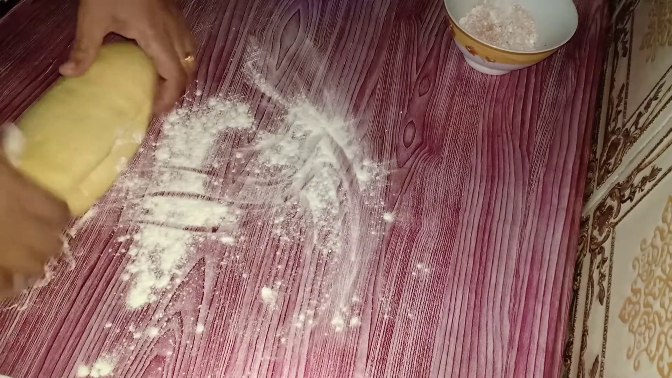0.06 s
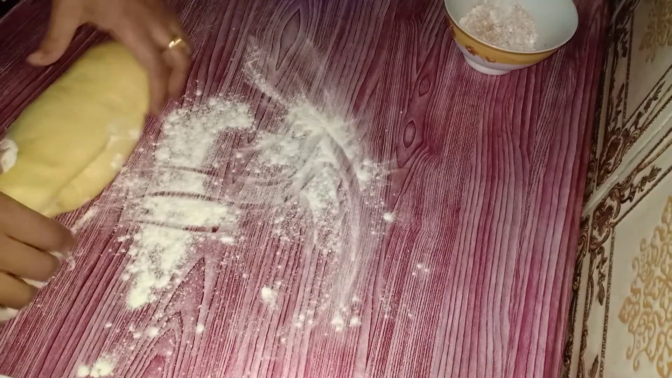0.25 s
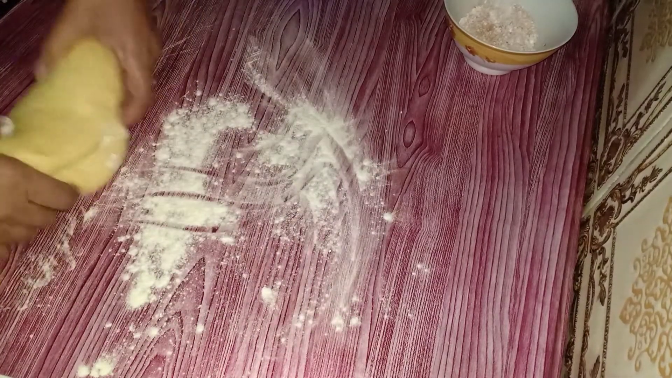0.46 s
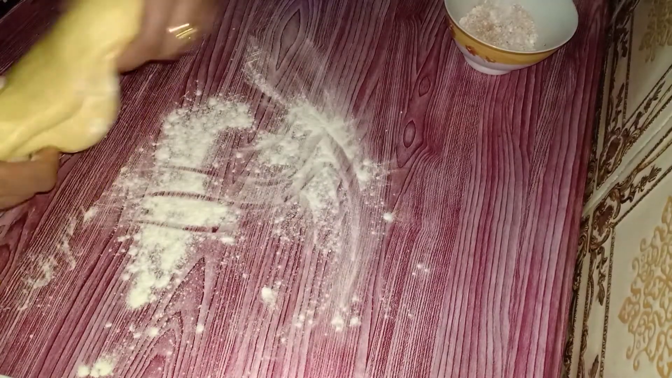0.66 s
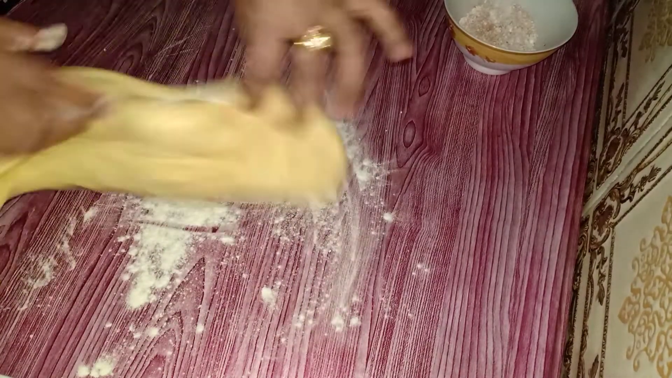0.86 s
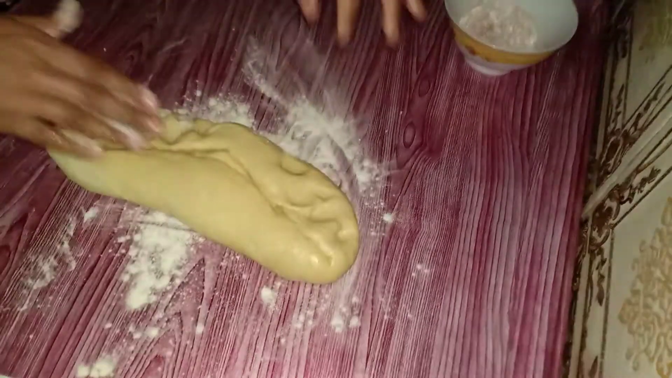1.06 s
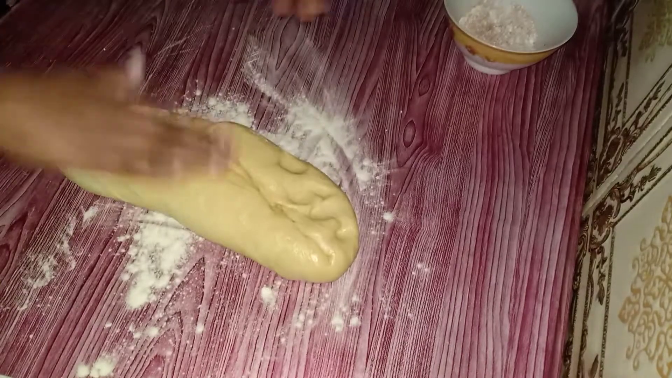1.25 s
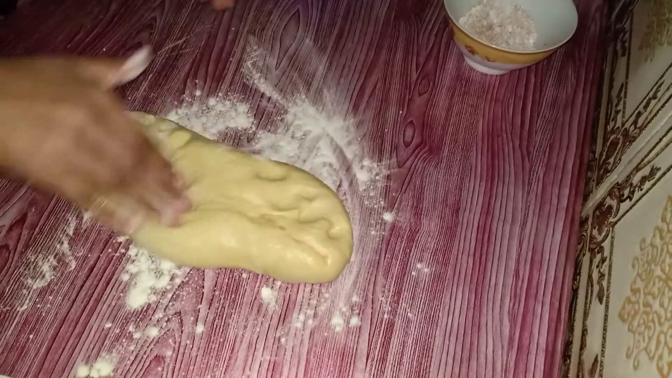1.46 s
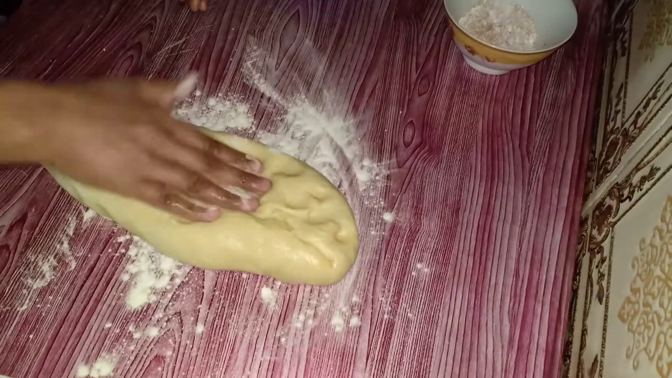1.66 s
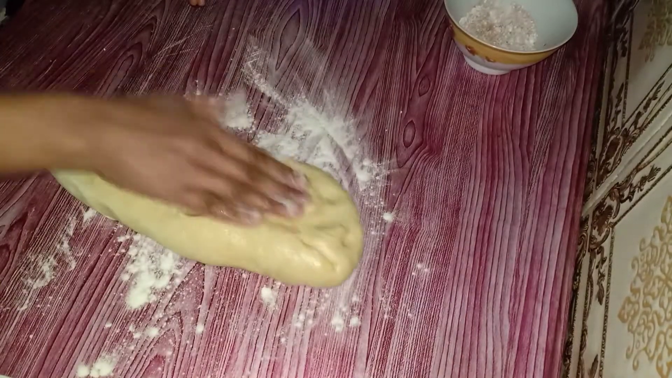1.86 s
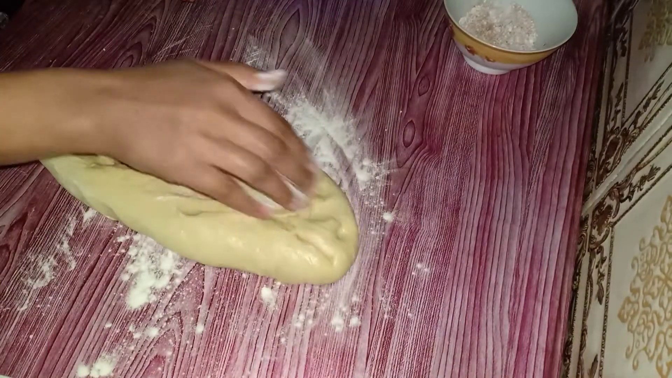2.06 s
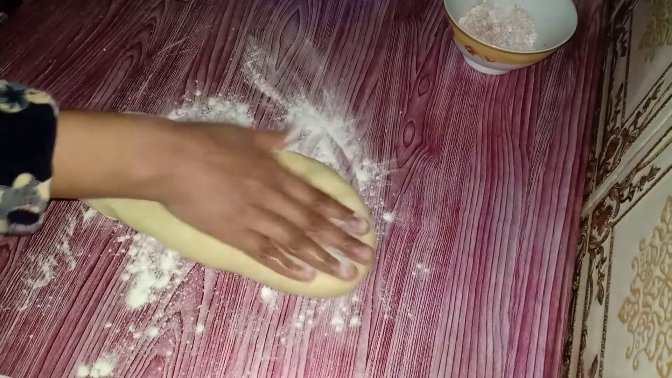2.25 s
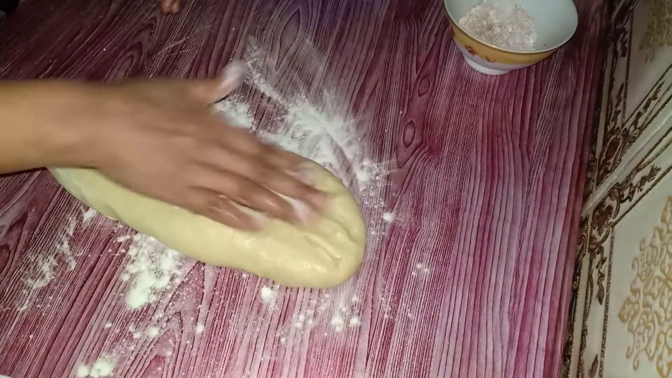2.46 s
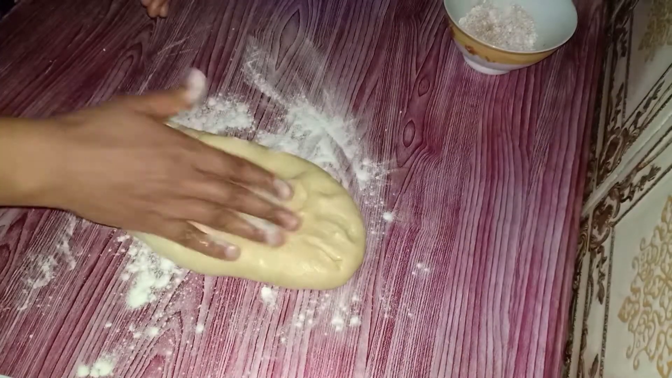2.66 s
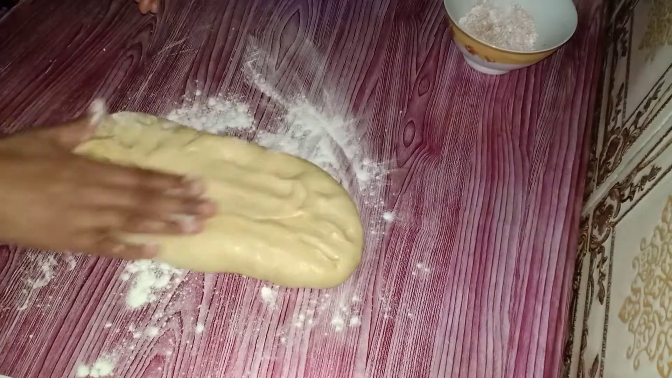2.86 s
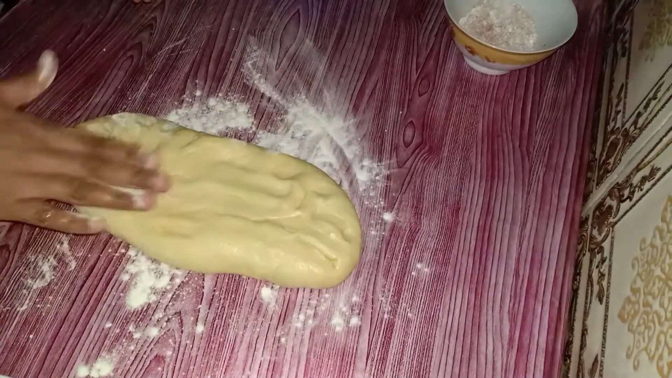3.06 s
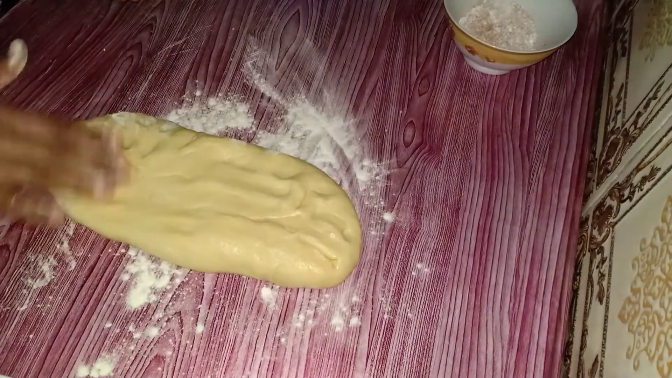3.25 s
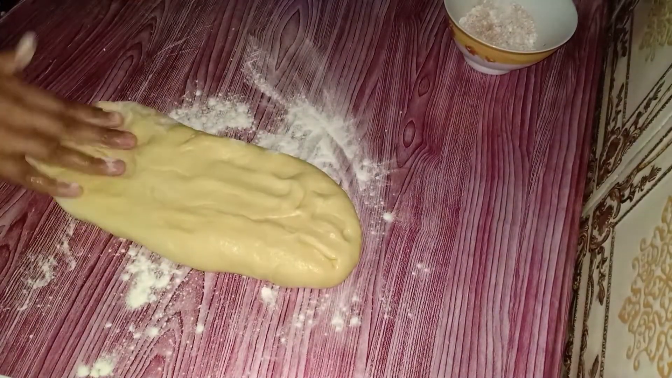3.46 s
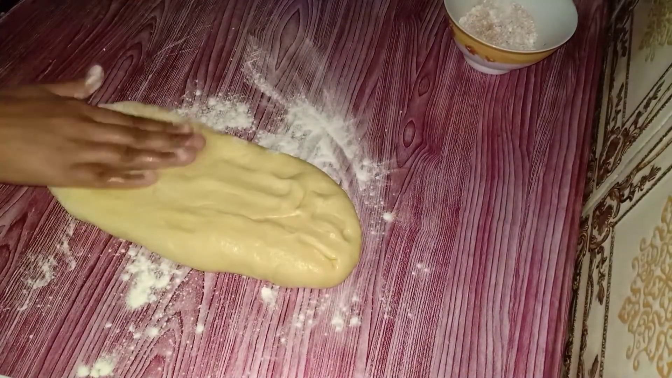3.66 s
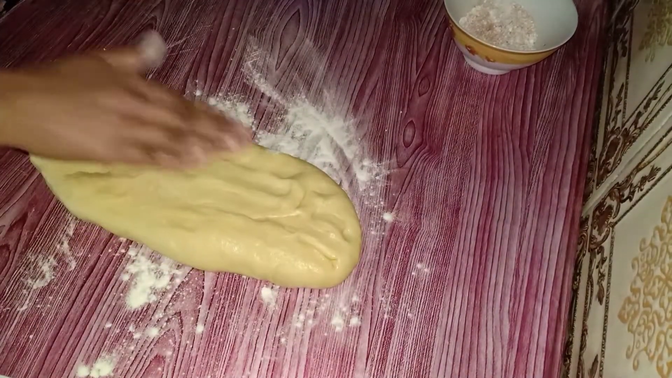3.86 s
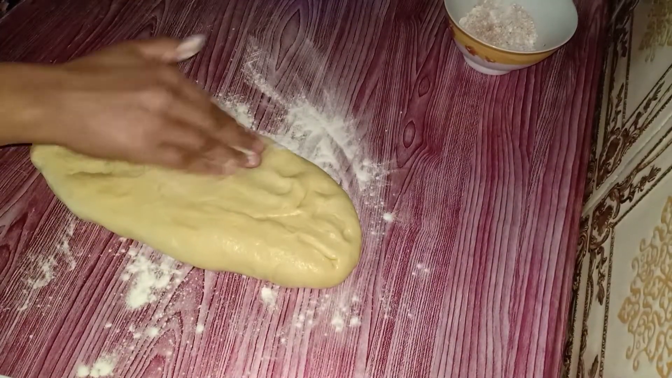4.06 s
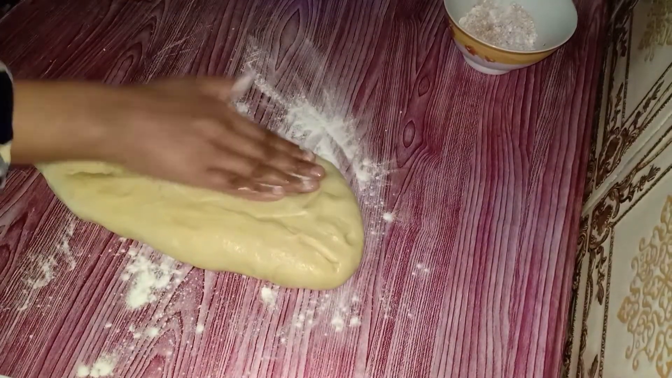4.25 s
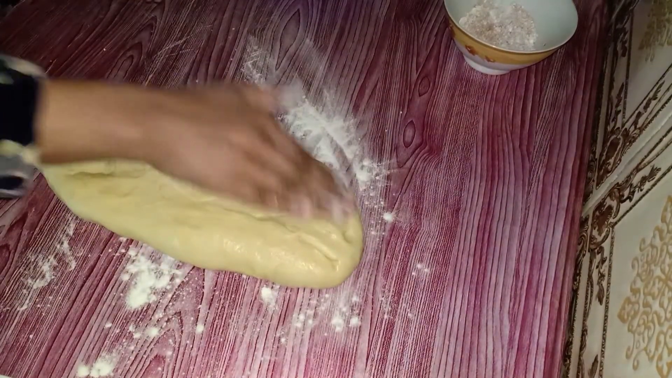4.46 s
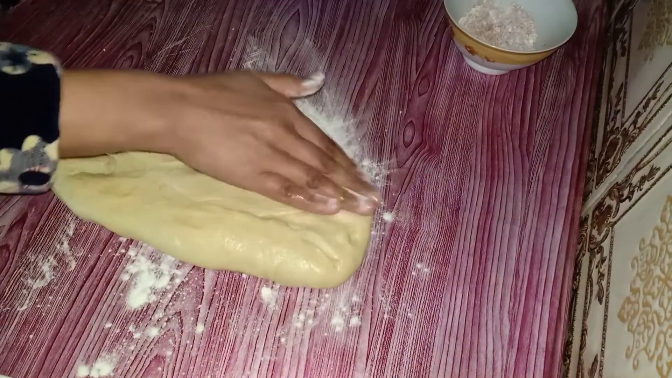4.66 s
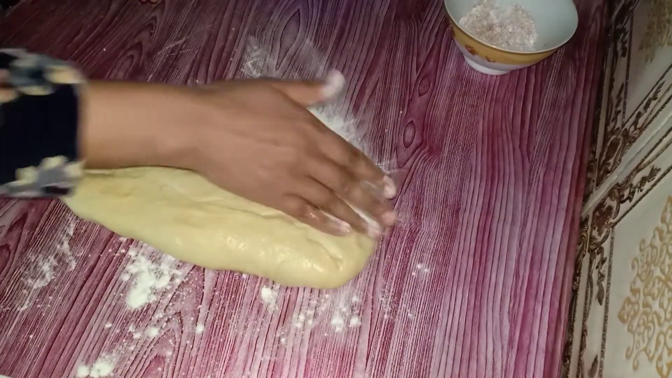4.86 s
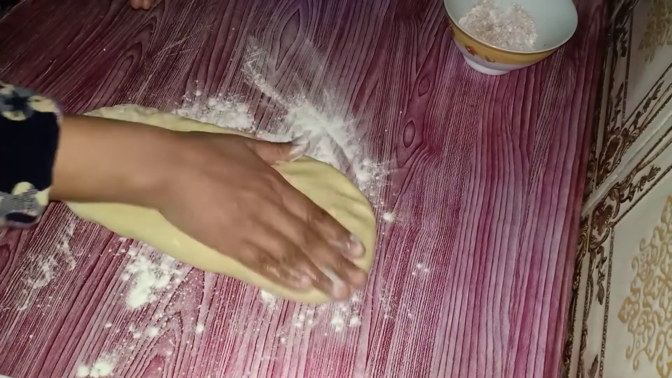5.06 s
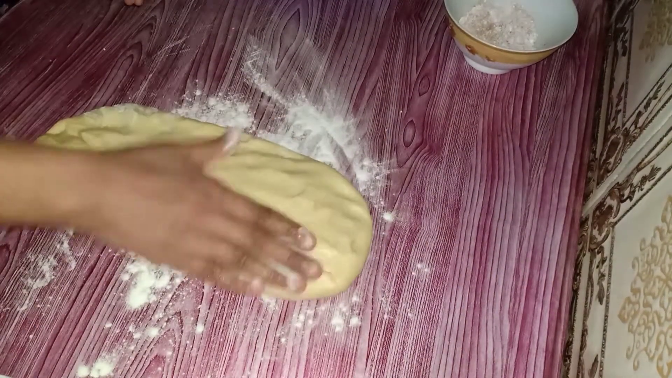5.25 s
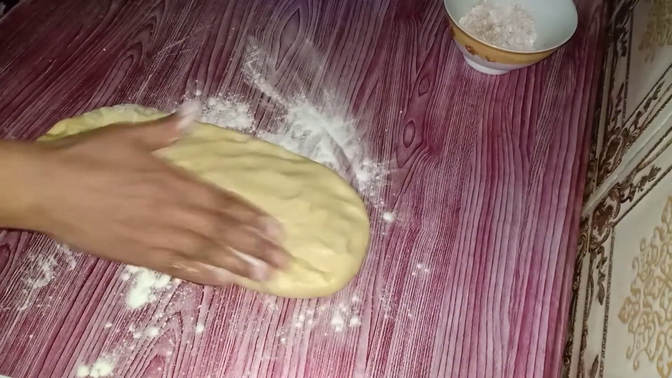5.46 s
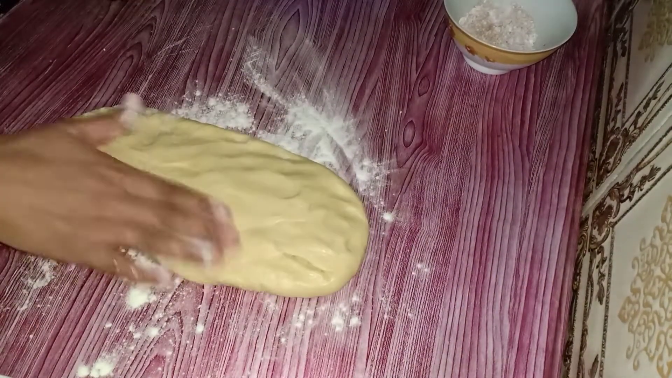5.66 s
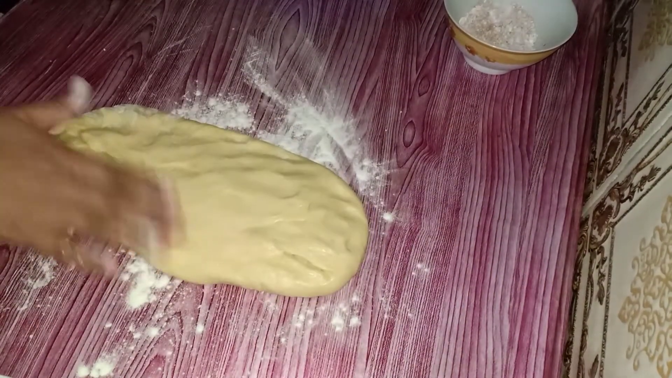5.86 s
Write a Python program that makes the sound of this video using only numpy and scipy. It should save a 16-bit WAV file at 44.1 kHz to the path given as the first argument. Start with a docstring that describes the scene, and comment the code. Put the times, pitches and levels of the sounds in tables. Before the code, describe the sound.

A small stereo microphone sits near a wooden table in a quiet, short-echoing kitchen. First come faint taps, rubbing, and a crisp tick as dough is lifted and turned. A single heavy low thud with a slapping edge dominates at one second. Afterwards a hand pats the dough regularly, low and cushioned, far quieter than the drop, with occasional brighter finger smacks and faint peeling brushes over steady soft background noise.

```python
"""In a bare kitchen a small two-port microphone stands close to a floured wooden table; its noise and the room's run on.
First a loaf of soft dough is turned: it drags in short hums of friction noise, pushes ring the table top's modes,
hands brush over flour as swells of noise, and fingers smack the skin as puffs of squeezed air.
Just after one second the loaf drops with the heaviest push, then it is patted flat by hand, and after each pat
the hand peels off with a soft brush. The room answers pushes and smacks with a dense decaying echo."""
import sys
import numpy as np
from scipy import signal
from scipy.io import wavfile

SR = 44100
rng = np.random.default_rng(int(sys.argv[2]) if len(sys.argv) > 2 else 0)


def boost_factor(decibels):
    """Convert a level in decibels to a linear amplitude factor."""
    exponent = np.asarray(decibels, float) / 20
    return 10 ** exponent


def to_wav(s):
    """Save 16-bit WAV."""
    ch = np.atleast_2d(s).T  # columns
    pcm = np.round(np.clip(ch, -1, 1) * 32767)  # PCM
    wavfile.write(sys.argv[1], SR, pcm.astype(np.int16))


N = 261072


def at_hz(points, hz, column=1):
    """Reads a table column on a log-frequency axis."""
    points = np.array(points)
    return np.interp(np.log(hz), np.log(points[:, 0]), points[:, column])


def drift(rate_hz):
    """Slow random wander of spread 1: noise through two equal poles, computed every 40 samples."""
    r = np.exp(-80 * np.pi * rate_hz / SR)
    white = rng.standard_normal(N // 40 + 2002)
    slow = signal.lfilter([1], [1, -2 * r, r * r], white)[2000:]   # drops the filter's start-up
    return np.interp(np.arange(N) / 40, np.arange(len(slow)), slow / slow.std())


def resonance(x, hz, width_hz):
    """One two-pole resonance."""
    r = np.exp(-np.pi * width_hz / SR)
    return signal.lfilter([1, 0, -1], [1, -2 * r * np.cos(2 * np.pi * hz / SR), r * r], x)


def add(out, s, sound):
    """Mixes a sound in at a time in seconds."""
    at = round(s * SR)
    out[:, at:at + sound.shape[-1]] += sound[..., :N - at]


# How alike the two ports hear a sound. Each row: frequency in Hz, left-right likeness from 0 to 1.
LIKENESS = [(60, 0.93), (180, 0.96), (550, 0.44), (1650, 0.039), (4970, 0.0081), (15000, 0.02)]


def noise_bands(size, count=2):
    """Yields centre Hz and stereo noise for count bands an octave, left and right alike in the bass."""
    edges = 31 * 2 ** (np.arange(0, 9.1 * count) / count)
    white = rng.standard_normal((2, 2, size))   # neighbouring bands get unrelated noise
    for k, (low, high) in enumerate(zip(edges, edges[1:])):
        band_pass = signal.butter(2, [low, high], "band", fs=SR, output="sos")
        mid, side = signal.sosfilt(band_pass, white[k % 2])
        hz = np.sqrt(low * high)
        alike = np.clip(at_hz(LIKENESS, hz), 0, 1)
        yield hz, np.sqrt(1 + alike) * mid + np.sqrt(1 - alike) * side * [[1], [-1]]


# Noise of the room and microphone. Each row: frequency in Hz, relative density in dB per Hz.
HUSH = [(18, -30), (30, -25), (48, -10.5), (86, 1), (120, -2.5), (226, -3), (596, -8.5), (860, -10.5),
        (1310, -17), (2270, -12), (3450, -20), (5110, -23), (9600, -34.5), (13900, -30), (15800, -44)]
HUSH_DB = -59   # both ports together, before the lean to the right


def hush(patchy_db):
    """Steady noise coloured band by band, each band wandering a little by itself."""
    out = 0
    for hz, noise in noise_bands(N, count=3):
        # played backwards, so that the filters' start-up falls at the end
        out = out + boost_factor(at_hz(HUSH, hz) + patchy_db * drift(12.4)) * noise[:, ::-1]
    return boost_factor(HUSH_DB) * out / out.std() * boost_factor([[-1], [1]])


# Short hums as the dough drags on the wood.
# Each row: middle in seconds, length in seconds, pitch in Hz, level in dB.
DRAGS = [(0.045, 0.091, 318, -54.5), (0.409, 0.072, 482, -47.5)]


def drags(width_hz):
    """Friction noise through one narrow resonance, swelling and fading."""
    t, out = np.arange(N) / SR, 0
    for (middle, length, hz, db), noise in zip(DRAGS, rng.standard_normal((len(DRAGS), N))):
        hum = resonance(noise, hz, width_hz)
        swell = np.exp(-(2 * (t - middle) / length) ** 4)
        out = out + boost_factor(db) * hum / hum.std() * swell
    return out


# Pushes into the table. Each row: start in seconds, strength in dB,
# place on the table top (+ mid-span, - near the edge), hardness of the contact in dB.
PATS = [(0.054, -47, 4, 12.5), (0.086, -53, 3.8, 12.5), (0.177, -62.5, 6, 23), (0.362, -45.5, 1.8, 13),
        (0.385, -56, -0.8, 7), (0.403, -51.5, 1.6, 11), (0.679, -54.5, 1.5, 10.5),
        (1.019, -32.5, -1.5, 13.5), (1.029, -19.5, -0.2, -0.5), (1.0358, -10, -0.6, -0.5),
        (1.33, -38, -1.2, 3), (1.634, -43.5, -1.5, 7), (1.943, -55, 1, 7), (2.279, -52, 3.8, 15),
        (2.313, -41.5, 0.4, -1.5), (2.616, -37, -1.37, 11.5), (2.626, -35, 3.3, 2), (2.905, -32, 1.2, -3.5),
        (3.179, -29, 0.3, -9.5), (3.425, -31, 0.2, -11), (3.736, -32, -1.1, -7), (3.992, -34, 0.6, -7.5),
        (4.255, -43.5, 0.7, 5.5), (4.534, -55.5, 3.9, 11.5), (4.79, -36, 2, 4.5), (5.076, -38, -0.05, -1),
        (5.347, -42, 1.7, 11), (5.573, -38, 0.3, -4.5), (5.609, -55, -.2, -15), (5.802, -32.5, 1.1, -11)]
# Table top modes. Each row: frequency in Hz, level in dB, share that rings on freely in dB,
# its t60 in seconds.
TABLE = [(59, 4, -4, .3), (64, -3, -6, .35), (84, -10, -12, .25), (105, -3, -2, .7), (111, -4, -2, .6),
         (145, -3, -8, .3), (153, -5, -6, .55), (178, -6, -14, .25), (212, -3, -13, .2),
         (235, -10, -11, .25), (272, -9, -12, .3), (305, -6, -10, .2), (340, -4, -10, .2),
         (366, -3, -9, .25), (433, -7, -10, .14), (485, -7, -10, .13), (530, -8, -10, .11),
         (580, -9, -10, .1), (625, -6, -9, .11), (668, -6, -9, .11), (715, -8, -9, .09), (766, -7, -9, .09),
         (816, -8, -9, .09), (880, -11, -9, .07), (942, -10, -9, .07), (1030, -12, -9, .06),
         (1120, -12, -9, .06), (1290, -13, -9, .06), (1480, -14, -9, .05)]
# How the top leans between the ports. Each row: frequency in Hz, left over right in dB.
TABLE_LEAN = [(60, -1), (180, -2.5), (550, -2), (1650, -1), (4970, -2.5), (15000, 0.0)]
# How a push drives the modes. Each row: frequency in Hz, level in dB, dB per unit of place,
# share of the hardness, share lost under a heavy load (dB per dB).
PUSH = [(59.6, -19, 1, 0.64, 0.47), (115.6, -8, 2.5, 0.023, 0.84), (167.4, -1.5, -0.77, 0.12, -0.057),
        (232, -4, -10.5, 0.2, 0.4), (393, -5.5, -1.5, 1, -0.028), (502, -3, -0.5, 0.93, -0.0012),
        (716, -9, 0, 0.96, 0.024)]
LOAD_FROM_DB = -38.5   # stronger pushes press a mass of dough on the top, which holds back the deepest modes
KNOCK_DB, KNOCK_CYCLES = 11, 9.0   # the first tight knock, over the ring that follows; cycles to fall 60 dB


def table(cushion_cycles, held_cycles, scatter_db):
    """Every push rings all modes; dough cushions the start and the resting hand damps most of the ring."""
    hz, level_db, free_db, t60 = np.transpose(TABLE)[:, :, None]
    t = np.arange(int(.55 * SR)) / SR
    fade = np.cos(np.pi / 2 * t / t[-1])   # to silence at the end
    swell = (1 - np.exp(-t / (cushion_cycles / hz + 0.0012))) ** 2 * fade
    knock = boost_factor(KNOCK_DB - 60 * t * hz / KNOCK_CYCLES)
    held = boost_factor(-60 * t * hz / held_cycles)
    free = boost_factor(free_db - 60 * t / t60)
    shape = boost_factor(level_db) * swell * (knock + held + free)

    mode_hz = hz[:, 0]
    lean = boost_factor(np.outer([.5, -.5], at_hz(TABLE_LEAN, mode_hz)))
    # upper modes reach the two ports out of step
    apart = np.arccos(np.clip(at_hz(LIKENESS, mode_hz), 0, 1)) / 2
    colour_db, place_db, hard_share, load_share = (at_hz(PUSH, mode_hz, column=k) for k in (1, 2, 3, 4))
    chance = rng.standard_normal((len(PATS), 3, len(TABLE)))
    out = np.zeros((2, N))
    for (s, strength_db, place, hard_db), (spot, load, turn) in zip(PATS, chance):
        push_db = strength_db + colour_db + place * place_db + hard_db * hard_share
        push_db = push_db - load_share * max(strength_db - LOAD_FROM_DB, 0)
        gain = lean * boost_factor(push_db + scatter_db * spot)   # where the hand lands favours some modes
        # the weight of dough and hand shifts the modes a little
        phase = 2 * np.pi * hz * (1 + .012 * load[:, None]) * t
        lag = np.outer([1, -1], 0.62 * apart * turn)
        in_step = gain * np.cos(lag) @ (shape * np.sin(phase))
        out_of_step = gain * np.sin(lag) @ (shape * np.cos(phase))
        add(out, s, in_step + out_of_step)
    return out


# The kitchen's reply. Each row: frequency in Hz, relative level in dB, t60 in seconds.
KITCHEN = [(94, -5, 0.49), (250, -18, 0.62), (648, -1, 0.34), (1340, -1.5, 0.54), (2500, 5, 0.46),
           (4630, -1, 0.54), (7900, 0.5, 0.56), (13000, 4, 0.48)]


def kitchen(x, first_echo_s):
    """Dense reflections: noise that sets in around the first echo and dies band by band."""
    t = np.arange(SR) / SR
    reply = 0
    for hz, noise in noise_bands(SR):
        decay_db = 60 * t / at_hz(KITCHEN, hz, column=2)
        reply = reply + boost_factor(at_hz(KITCHEN, hz) - decay_db) * noise
    onset = 1 - np.exp(-(t / first_echo_s) ** 2)
    reply = reply * onset * boost_factor([[-1], [1]])
    return signal.fftconvolve(x[None], reply, axes=1)[:, :N]


# Hands brushing over flour and dough: turning, sliding, the drop, and one brisk peel-off late in the patting.
# Each row: middle in seconds, length in seconds, fine airy part in dB, coarse part in dB.
BRUSH = [(0.07, 0.049, -73, -59.5), (0.169, 0.16, -67.5, -57.5), (0.254, 0.097, -72, -64),
         (0.418, 0.11, -80.5, -52.5), (0.502, 0.18, -61.5, -57), (0.638, 0.15, -66.5, -59),
         (0.825, 0.32, -78, -69.5), (1.039, 0.093, -63, -49.5), (1.957, 0.11, -73, -64),
         (2.298, 0.079, -71, -64), (5.261, 0.047, -66, -57.5)]
# Colour of the brushing. Each row: frequency in Hz, relative density in dB per Hz.
BRUSH_COLOUR = [(410, -54), (700, -30), (874, 9.5), (933, -2), (1230, -4), (1450, -2), (2180, 5),
                (3960, -7), (4640, 4.5), (8900, -25), (13700, -4.5), (15800, -23)]
# once patting starts the hand peels off the dough after every pat
PATTING_FROM_S, ONE_PAT_S = 1.2, .1   # a push this soon after another belongs to the same pat
LIFT_AFTER_S, LIFT_S, LIFT_FINE_DB, LIFT_COARSE_DB = 0.14, 0.11, -74.5, -66


def brush(grain_db):
    """Fine and coarse friction noise; each stroke swells and fades smoothly and flickers a little."""
    fine, coarse, flicker = 0, 0, drift(20)
    for hz, noise in noise_bands(N, count=3):
        band = boost_factor(at_hz(BRUSH_COLOUR, hz) + grain_db * flicker) * noise
        airy = np.clip(np.log2(hz / 5000), 0, 1)   # share of the fine part
        fine = fine + np.sqrt(airy) * band
        coarse = coarse + np.sqrt(1 - airy) * band

    push_s = np.array(PATS)[:, 0]
    new_pat = np.diff(push_s, prepend=0) > ONE_PAT_S
    pat_s = push_s[new_pat & (push_s > PATTING_FROM_S)]
    lifts = [(s + LIFT_AFTER_S, LIFT_S, LIFT_FINE_DB, LIFT_COARSE_DB) for s in pat_s]
    middle, length, fine_db, coarse_db = np.transpose(BRUSH + lifts)[:, :, None]
    t = np.arange(0, N, 50) / SR
    swell = np.exp(-4 * ((t - middle) / length) ** 2)

    def gain(db):
        """Adds the strokes' powers and reads the sum at every sample."""
        return np.interp(np.arange(N) / SR, t, np.sqrt(np.sum((boost_factor(db) * swell) ** 2, 0)))

    strokes = gain(fine_db) * fine / fine.std() + gain(coarse_db) * coarse / coarse.std()
    return strokes * boost_factor([[-1], [1]])


# Skin smacking on dough. Each row: start in seconds, peak of the pitched part in dB before the ports,
# pitch of the trapped air in Hz, length in ms, broad part over the pitched part in dB.
SMACKS = [(0.1739, -43, 2420, 1.6, 2.5), (0.4607, -27, 2740, 1.9, -8.5), (0.4708, -39, 2580, 4.7, -4),
          (0.5324, -47.5, 2780, 2.8, 10), (1.0168, -28.5, 1930, 4.5, -5), (1.0268, -22, 2400, 3.5, -41),
          (1.0361, -25.5, 2270, 3.1, 7), (1.039, -18, 860, 5.6, -28), (1.3287, -39.5, 2640, 2.9, 4.5),
          (1.6363, -35, 2500, 3.3, -6), (2.2784, -43, 4270, 2.2, -13), (2.2821, -53, 5900, 5.9, 13.5),
          (2.3056, -40, 2500, 1.8, -5), (2.3135, -29.5, 2660, 1.6, -28), (2.6134, -27.5, 3760, 7.8, 0.5),
          (2.617, -23.5, 5750, 4.2, -8), (2.6242, -22, 1950, 0.78, -19), (2.9056, -48, 4900, 2.9, 15),
          (2.918, -58, 5570, 3, 18.5), (3.1793, -37.5, 4600, 2.2, 3), (3.423, -56, 3030, 7, 18),
          (3.7317, -38, 2600, 2.8, 2.5), (3.738, -42, 4460, 3, 2), (3.991, -34.5, 2350, 2.04, 3),
          (4.2533, -55.5, 4000, 5.5, 15.5), (4.5352, -56, 1840, 3.5, 11.5), (4.5557, -47, 4370, 1.9, -2),
          (4.7898, -36, 2500, 2.2, 1.5), (5.0761, -45, 4150, 3.1, 10.5), (5.3481, -30.5, 3720, 3.24, -0.5),
          (5.5103, -54, 4530, 2.2, 7), (5.575, -51, 2090, 2.9, 9), (5.6146, -56.5, 5070, 3.3, -2),
          (5.7983, -54, 4920, 3.6, 15)]
# top of the broad part; heavier puffs come from a wider contact and are duller
EDGE_HZ, HEAVY_DB, DULLING_OCT_PER_DB = 6670, -35.5, .1
POCKET_TO_ROOM_DB = -8.5   # the pitched puff beams at the microphone and feeds the room less


def smacks(sharpness, top_hz, air_db):
    """Air squeezed from under a finger: a short puff, part broad, part through a wide resonance.
    Rows: left, right, and the smooth average over all directions that feeds the room."""
    out, t = np.zeros((3, N)), np.arange(900) / SR
    chance = rng.standard_normal((len(SMACKS), 2, 900))
    for (s, peak_db, hz, ms, broad_db), noise in zip(SMACKS, chance):
        tau = max(ms, .2) / 1000
        puff = (noise[0] + 0.75 * noise[1] * [[1], [-1]]) * t / tau * np.exp(-2 * t / tau)
        to_room = np.sqrt(np.sum(puff ** 2) / 2) * (t == 0)   # one click of the puff's energy
        puff = np.vstack([puff, to_room])
        pitched = resonance(puff, hz, hz / sharpness)
        edge_hz = EDGE_HZ * 2 ** (-DULLING_OCT_PER_DB * max(peak_db + broad_db - HEAVY_DB, 0))
        broad = signal.sosfilt(signal.butter(2, [650, edge_hz], "band", fs=SR, output="sos"), puff)
        sound = boost_factor([[0], [0], [POCKET_TO_ROOM_DB]]) * pitched / np.abs(pitched[:2]).max()
        sound = sound + boost_factor(broad_db) * broad / np.abs(broad[:2]).max()
        add(out, s, boost_factor(peak_db) * sound)
    # the ports pass little above top_hz, but for a small port resonance
    dull = signal.sosfilt(signal.butter(8, top_hz, fs=SR, output="sos"), out)
    air = signal.sosfilt(signal.butter(2, [12000, 15500], "band", fs=SR, output="sos"), out)
    return (dull + boost_factor(air_db) * air + boost_factor(air_db - 6) * out) * boost_factor([[-1], [1], [0]])


def scene():
    """Hush, drags, table, echo, brushing and smacks, as they reach the microphone."""
    # cushion: how softly a push sets in; scatter: spread of mode strength between pushes
    wood = table(cushion_cycles=.5, held_cycles=29.0, scatter_db=1.2)
    skin = smacks(sharpness=8, top_hz=5900, air_db=-6)   # sharpness: the air pocket's Hz over width
    echo = kitchen(boost_factor(-30.5) * wood.mean(0) + boost_factor(-36) * skin[2], first_echo_s=0.0024)
    return hush(patchy_db=1.2) + drags(width_hz=14) + wood + echo + brush(grain_db=1.2) + skin[:2]


def band_limit(x):
    """A steep low-pass at the top of the band."""
    return signal.sosfilt(signal.butter(12, 15940, fs=SR, output="sos"), x)


def record(dry):
    """The microphone loses the deep bass, and its converter adds a small steady offset."""
    heard = signal.sosfilt(signal.butter(4, 44, "high", fs=SR, output="sos"), dry)
    heard = heard + .0011
    return band_limit(heard)


dry = scene()
out = record(dry)
to_wav(out)
```